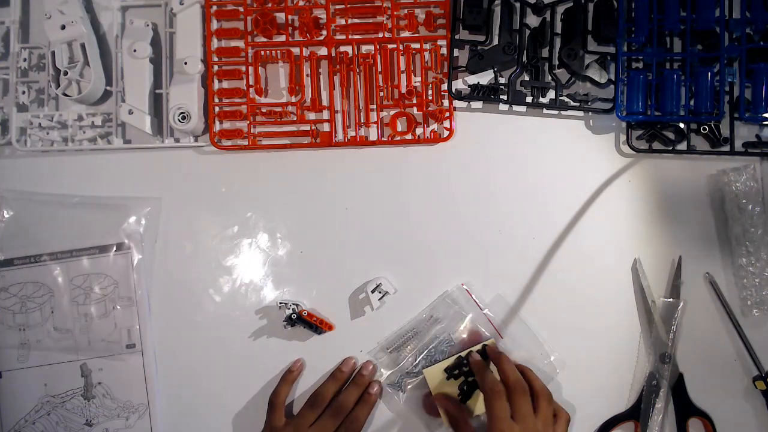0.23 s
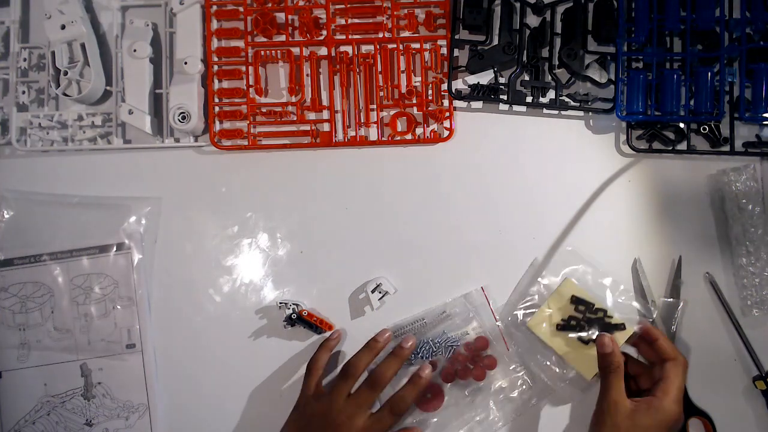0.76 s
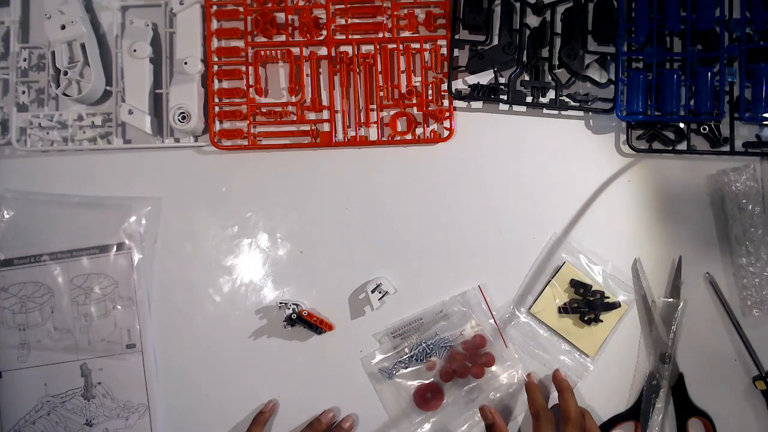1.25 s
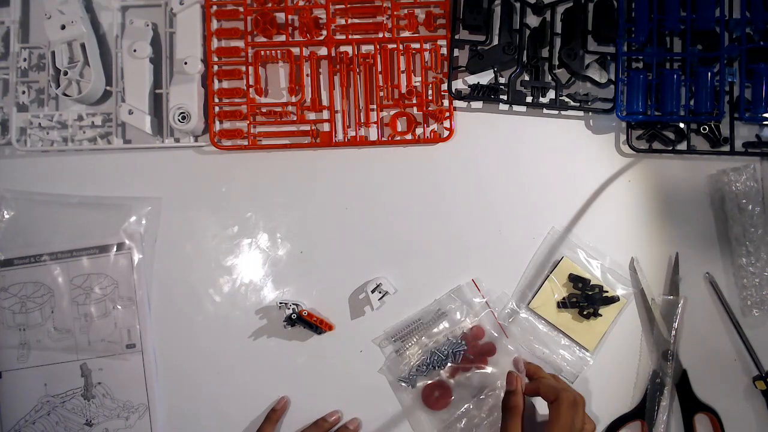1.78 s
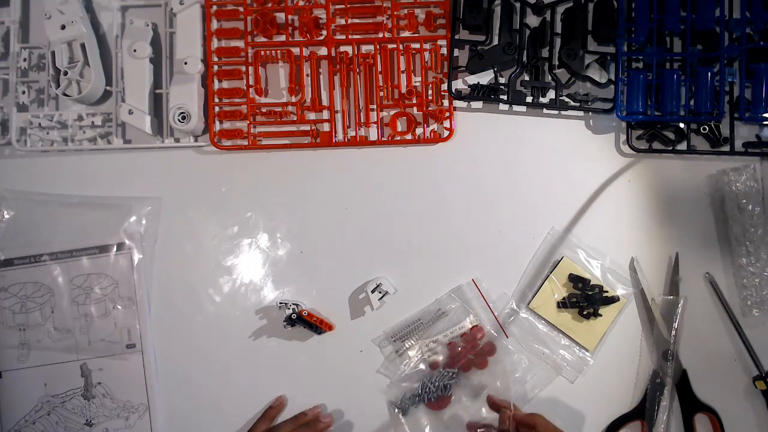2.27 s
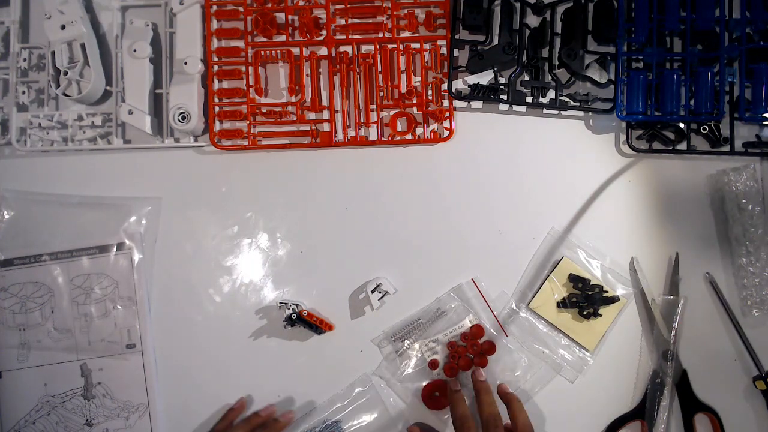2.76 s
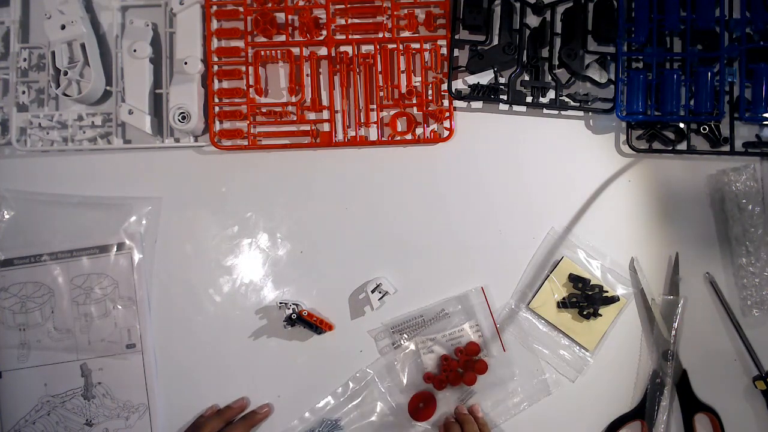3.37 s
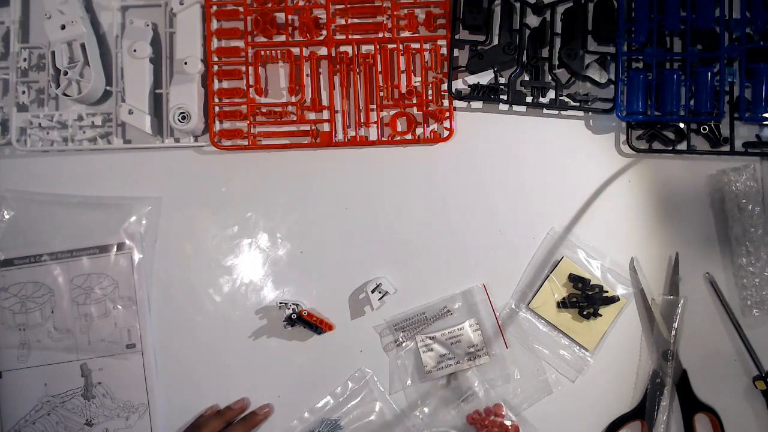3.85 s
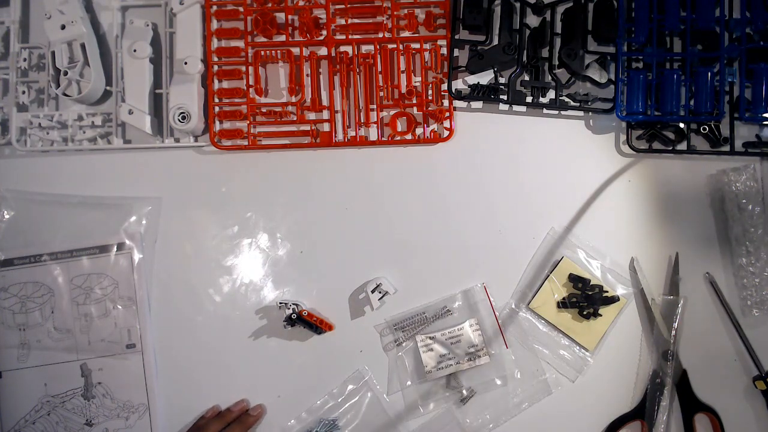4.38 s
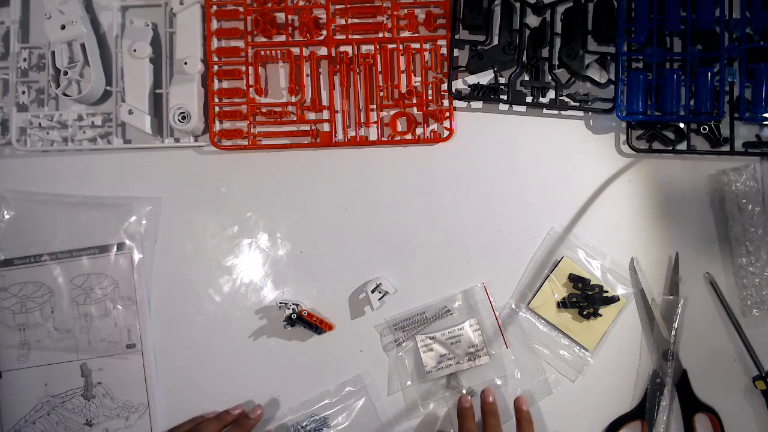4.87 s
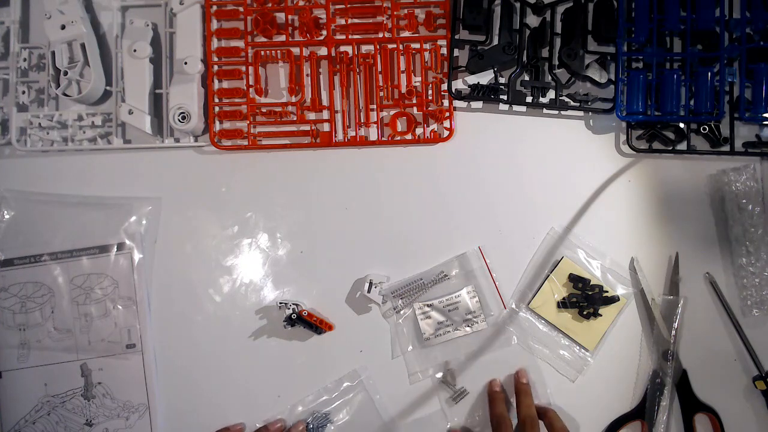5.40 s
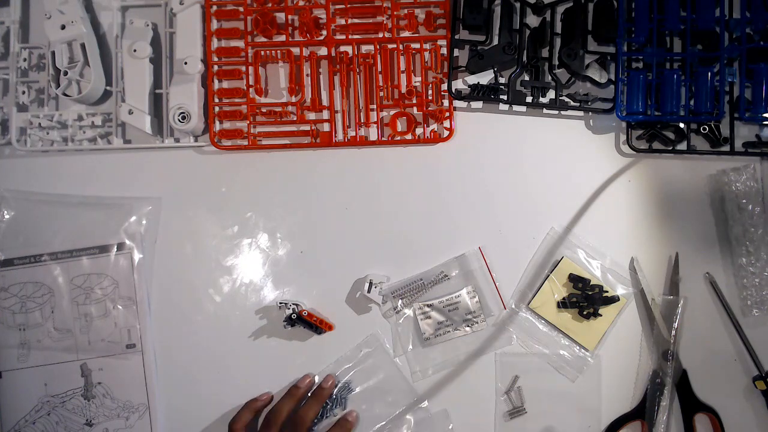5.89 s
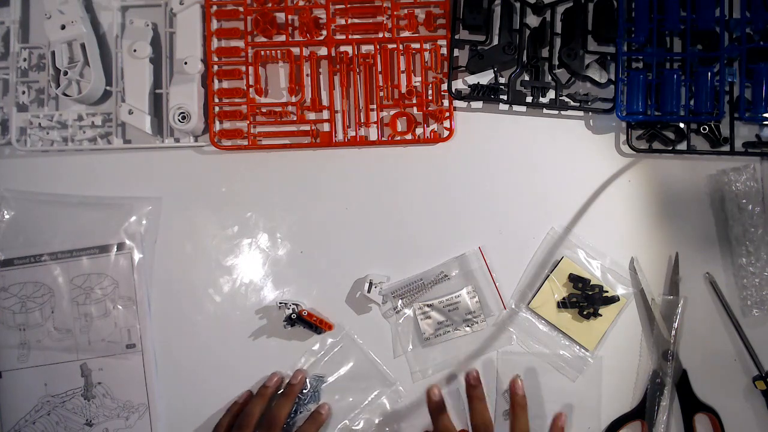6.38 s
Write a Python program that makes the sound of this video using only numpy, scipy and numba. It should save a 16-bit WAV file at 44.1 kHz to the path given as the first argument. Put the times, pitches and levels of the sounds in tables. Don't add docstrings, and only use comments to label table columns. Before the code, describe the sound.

Hands sort little plastic bags of parts on a hard table. Sharp film snaps come in irregular clusters, mixed with dry scraping, dull taps and faint finger squeaks, with near silence between. One sudden heavy smack and rattle stands far above the rest past the middle, then small crinkles return and grow at the end. Very close stereo microphone under the table, slightly stronger on the right, with a short room tail.

```python
import sys
import numpy as np
from scipy import signal
from scipy.fft import rfft, irfft
from scipy.io import wavfile
from scipy.ndimage import uniform_filter1d
from numba import njit

SR = 44100
rng = np.random.default_rng(int(sys.argv[2]) if len(sys.argv) > 2 else 0)


def master_out(mix):
    frames = np.transpose(np.atleast_2d(mix))
    ceiling = np.clip(frames, -1, 1)
    pcm = np.round(ceiling * 32767).astype(np.int16)
    wavfile.write(sys.argv[1], SR, pcm)


def natural_amplitude(level_db):
    exponent = np.asarray(level_db, float) / 20
    return 10 ** exponent


N = 292824

PAN_DB = -3.5
CREASE_HZ = [2230, 3300, 4890, 6070, 7310]


def unit(x):
    return x / np.sqrt(np.mean(x ** 2))


def peak(x):
    return x / np.abs(x).max()


def curve(f, hz, values):
    return np.interp(np.log(f), np.log(hz), values)


def panned():
    return natural_amplitude([[PAN_DB / 2], [-PAN_DB / 2]])


@njit
def svf(x, hz, sharp):
    y, b, l, k = np.empty(len(x)), 0., 0., 1 / sharp
    for i in range(len(x)):
        g = np.tan(np.pi * hz[i] / SR)
        v = (b + g * (x[i] - l)) / (1 + g * (g + k))
        b, l, y[i] = 2 * v - b, l + 2 * g * v, k * v
    return y


def band(x, hz, sharp):
    return svf(x + 1e-18, hz + np.zeros(len(x)), sharp)


def steep(x, hz, sharp):
    return band(band(x, hz, sharp), hz, sharp)


def walk(rate):
    k = int(SR / rate)
    levels = np.repeat(rng.standard_normal(N // k + 1), k)
    return 1.3 * uniform_filter1d(uniform_filter1d(levels, k), k)[:N]


def ticks(size, rate, scatter_db):
    happens = rng.random(size) < rate / SR
    return happens * rng.standard_normal(size) * natural_amplitude(scatter_db * rng.exponential(size=size))


def add(out, start_s, level_db, sound):
    i = int(start_s * SR)
    out[..., i:i + sound.shape[-1]] += sound[..., :N - i] * natural_amplitude(level_db)


def whine():
    comb_hz, chirp_hz, frame_hz = 200, 8000, 24
    t = np.arange(N) / SR
    comb = np.zeros(N)
    for k, (spread, phase) in enumerate(rng.standard_normal((18, 2)), 21):
        comb += natural_amplitude(-103 + 3.0 * spread) * np.sin(2 * np.pi * (k * comb_hz * t + phase))
    gate = uniform_filter1d(1. * ((frame_hz * t + .2) % 1 < .45), size=100)
    return comb + natural_amplitude(-90.5) * gate * np.sin(2 * np.pi * chirp_hz * t)


def hum():
    # pitch_hz, sharpness, level_db (rms)
    fan_lines = [(108, 2.9, -75.5), (181, 9.2, -74), (1120, 40., -98.5), (5560, 200., -93.5)]
    lines = np.zeros(N)
    for hz, sharp, level_db in fan_lines:
        line = unit(band(rng.standard_normal(N), hz, sharp))
        lines += natural_amplitude(level_db + 0.83 * walk(3.2)) * line
    return lines * panned()


def air():
    # frequency_hz, density_db (per Hz)
    spectrum = [(15, -29), (25, 8), (131, -6), (176, -3.5), (304, -13.5), (444, -9), (667, -23.5),
                (764, -25), (1430, -32), (2590, -32.5), (5540, -30), (7670, -33), (8790, -42.5),
                (15100, -47.5), (16400, -56.5)]
    f = np.maximum(np.fft.rfftfreq(N, 1 / SR), 1)
    colour = natural_amplitude(curve(f, *np.transpose(spectrum)))
    mid, side = irfft(rfft(rng.standard_normal((2, N))) * colour, N)
    out = 0
    for centre in 18 * 2 ** np.arange(0, 10.1, 1 / 2):
        wander_db = 3.5 * walk(5) * min(200. / centre, 1) + .6 * walk(12)
        wide = np.clip(centre / 2000., .3, 1)
        sides = np.array([band(mid + wide * side, centre, 2.5), band(mid - wide * side, centre, 2.5)])
        pan_db = PAN_DB * np.clip(np.log2(8000 / centre) / 2, 0, 1)
        out = out + natural_amplitude(wander_db) * sides * natural_amplitude([[pan_db / 2], [-pan_db / 2]]) / np.hypot(1, wide)
    return unit(out) * natural_amplitude(-65)


def room(sound):
    # frequency_hz, t60_s, level_db
    decay = [(60, 0.27, 9), (250, 0.18, 5.5), (960, .18, 7.5), (2510, 0.12, -3), (4950, 0.15, -2),
             (11240, .15, -4)]
    hz, t60_s, level_db = np.transpose(decay)
    t = np.arange(16384) / SR
    echoes = 0
    for f in 45 * 2 ** np.arange(0, 8.6, .5):
        mid, side = (band(rng.standard_normal(len(t)), f, 2.3) / np.sqrt(f) for _ in range(2))
        fade = natural_amplitude(curve(f, hz, level_db) - 60 * t / curve(f, hz, t60_s))
        width = .9 * min(f / 1500., 1)
        echoes = echoes + np.sqrt(f) * fade * (mid + np.array([[1], [-1]]) * side * width)
    build = 1 - np.exp(-t / 0.0049)
    echoes = unit(echoes * build) / np.sqrt(len(t))
    return signal.fftconvolve(sound[None], echoes, axes=1)[:, :N]


def thumps():
    # start_s, peak_db, pitch_hz, t60_s
    blows = [(0.0, -49, 40.4, 0.22), (0.168, -36.5, 39.6, 0.05), (0.341, -37.5, 165, 0.062),
             (0.758, -53, 43.1, 0.15), (1.028, -41.5, 122.8, 0.12), (1.221, -33.5, 192, 0.12),
             (2.1, -44.5, 29.6, 0.15), (2.199, -49.5, 130.8, 0.11), (2.487, -37, 37.7, 0.13),
             (2.827, -37, 48.4, 0.12), (3.099, -48, 29.6, 0.37), (4.145, -18, 106.2, 0.05),
             (4.169, -27, 42, 0.12), (4.75, -46, 30, 0.12), (4.85, -47, 40, 0.39),
             (5.028, -46, 29.07, 0.25), (5.33, -59, 29.7, 0.09), (5.529, -51, 35.0, 0.13),
             (5.649, -45.5, 176.7, 0.15), (5.953, -50, 52.7, 0.2), (6.107, -49, 40.7, 0.13),
             (6.45, -37.5, 29.9, 0.15)]
    out, t = np.zeros(N), np.arange(16384) / SR
    for start_s, peak_db, hz, t60_s in blows:
        swing = np.sin(2 * np.pi * hz * t) + .4 * np.sin(2 * np.pi * 1.9 * hz * t)
        onset = 1 - np.exp(-t / 0.0018)
        add(out, start_s, peak_db - 3.5, swing * onset * natural_amplitude(-60 * t / t60_s))
    return out


def slap():
    # start_s, peak_db, push_s
    drop_event = (4.1442, -7, .0016)
    start_s, peak_db, push_s = drop_event
    out = np.zeros(N)
    add(out, start_s, peak_db, -np.hanning(int(push_s * SR)))
    return out


def board(push, hz, sharp):
    sound = band(push, hz, sharp)
    sound = sound + 0.54 * band(push, .52 * hz, sharp) + 0.29 * band(push, 1.46 * hz, sharp)
    return steep(sound, 0.83 * hz, .7)


def smooth(sound, colour):
    return colour * np.sqrt(np.sum(sound ** 2) / np.sum(colour ** 2)) / np.abs(sound).max()


def knocks():
    # start_s, peak_db, pitch_hz, rattle_s, room_db, sharpness
    hits = [(0.058, -33, 1170, 0.0065, 4, 1.7), (0.16, -32, 1310, 0.012, -9, 1.3),
            (0.264, -39, 1460, 0.011, -4, 2.6), (0.338, -34.5, 1210, 0.0021, -24, 1.4),
            (0.479, -30, 1000, 0.014, -16, 8), (0.491, -24, 1030, 0.0036, -9, 1.3),
            (0.504, -37.5, 430, 0.006, -14, 4.0), (0.755, -31.5, 1190, 0.0084, 3, 1.3),
            (0.771, -35, 436, 0.0067, -4, 5.6), (1.013, -34.5, 692, 0.0093, 1.5, 7.5),
            (1.222, -34.5, 633, 0.006, 0, 11.3), (1.556, -53.5, 1320, 0.006, 4, 3.4),
            (2.029, -44, 824, 0.002, -1.5, 2.4), (2.199, -45.5, 1220, 0.0023, 8.5, 5.7),
            (2.21, -46, 935, 0.0075, 4.5, 6.8), (2.348, -31, 980, 0.0063, -0.5, 1.4),
            (2.427, -40, 890, 0.018, 4, 2.4), (2.465, -27.5, 1110, 0.0026, 4, 1.4),
            (2.484, -31.5, 756, 0.0032, -9, 2.9), (2.766, -48.5, 762, 0.0054, -4, 5.8),
            (2.796, -43, 708, 0.0046, -2.5, 8.2), (3.088, -43, 1570, 0.016, 4.5, 3.8),
            (3.149, -56.5, 735, 0.006, 1, 4.7), (3.335, -52, 768, 0.0037, 4.5, 2.3),
            (3.931, -60.5, 1124, 0.006, 1.5, 5.6), (4.11, -19.5, 1010, 0.013, 5, 1.54),
            (4.14, -14.5, 393, 0.011, -11.5, 1.8), (4.151, -19, 335, 0.0048, -8.5, 1.3),
            (4.835, -33, 754, 0.0085, -4, 6.3), (4.95, -52, 682, 0.006, 5, 3.2),
            (5.009, -27.5, 1090, 0.011, -5, 2), (5.029, -42, 1140, 0.0095, 6.5, 1.33),
            (5.102, -48, 774, 0.0084, -7.5, 6), (5.313, -55.5, 811, 0.014, 5, 5.9),
            (5.595, -43.5, 765, 0.006, 3.5, 3), (5.616, -40.5, 854, 0.005, 3.5, 2.6),
            (5.946, -46.5, 766, 0.013, 3.5, 3), (5.973, -36.5, 770, 0.018, -4, 2.2),
            (6.275, -42, 926, 0.013, 12, 2.3), (6.298, -40.5, 700, 0.018, 6.5, 3.3),
            (6.357, -36.5, 673, 0.0066, 5.5, 3.3), (6.42, -31, 1030, 0.003, 3.5, 2),
            (6.615, -33.5, 742, 0.0043, -2, 9.4)]
    near, far, t = np.zeros(N), np.zeros(N), np.arange(4096) / SR
    for start_s, peak_db, hz, rattle_s, room_db, sharp in hits:
        push = rng.standard_normal(len(t)) * (1 - np.exp(-t / 0.0028)) * np.exp(-t / rattle_s)
        push[0] += 6.5
        sound = board(push, hz, sharp)
        single = board(1. * (t == 0), hz, sharp)
        add(near, start_s, peak_db, peak(sound))
        add(far, start_s, peak_db + room_db, smooth(sound, single))
    return near, far


def squeaks():
    # start_s, length_s, pitch_hz, level_db
    drags = [(0.569, 0.19, 3200, -66), (1.36, .12, 2180, -55.5), (1.556, 0.073, 4840, -66),
             (2.244, 0.13, 1360, -57), (2.527, 0.14, 1390, -70), (4.309, 0.043, 5050, -65.5),
             (4.33, .03, 3420, -70), (4.351, 0.097, 4220, -71), (4.522, 0.0455, 3840, -64.5),
             (5.059, 0.265, 1340, -65), (5.101, 0.69, 3300, -74), (5.757, 0.21, 3300, -80)]
    out = np.zeros(N)
    for start_s, length_s, hz, level_db in drags:
        rub = unit(steep(rng.standard_normal(SR // 2), hz, 11.0))[:int(length_s * SR)]
        add(out, start_s, level_db - 10.5, rub * signal.windows.tukey(len(rub), .5))
    return out


def rustle():
    # start_s, film_db, scrape_db
    slides = [(0.0, -79, -68.5), (0.13, -64, -56.5), (0.24, -60, -82), (0.35, -76, -86), (0.46, -73, -71.5),
              (1.07, -79, -85), (1.29, -83, -83), (1.44, -75, -70), (1.59, -85, -82), (1.85, -82, -84.5),
              (2.07, -82, -87), (2.24, -76, -78), (2.39, -80, -49.5), (2.55, -83, -75.5),
              (2.81, -78.5, -76), (3.01, -82, -80), (3.16, -75, -72), (3.24, -64.5, -72),
              (3.37, -82, -78.5), (3.6, -84, -80.5), (4.03, -81.5, -82), (4.25, -72, -81),
              (4.59, -83.5, -82.5), (4.86, -119, -85.5), (4.99, -70, -64.5), (5.16, -83, -72),
              (5.55, -67.5, -77.5), (5.66, -89, -87.5), (5.88, -81.5, -74), (5.99, -82, -81),
              (6.32, -70.5, -74.5), (6.44, -63, -53), (6.47, -60, -78), (6.64, -51.5, -64.5)]
    start_s, *columns = np.transpose(slides)
    film_db, scrape_db = (np.interp(np.arange(N) / SR, start_s, c) for c in columns)
    creases = ticks(N, 4000, scatter_db=2.0) * natural_amplitude(5.2 * walk(36))
    crinkle = sum(natural_amplitude(8.9 * walk(6.5)) * band(creases, f, 2.3) for f in CREASE_HZ)
    crinkle = crinkle + 0.98 * steep(creases, 5700, .8) + .12 * band(creases, 11000, .9)
    grit = ticks(N, 4000, scatter_db=1.5) * natural_amplitude(2.5 * walk(30))
    scrape = steep(grit, 900, 1.)
    return natural_amplitude(film_db) * unit(crinkle) + natural_amplitude(scrape_db) * unit(scrape)


def film(push, other, hz, top_db, share_db):
    both = push + other
    body = band(both, hz, 5.) + .3 * steep(both, 3600, .8)
    body = body + sum(natural_amplitude(d) * band(both, f, 8.) for f, d in zip(CREASE_HZ, share_db))
    fizz = steep(push + 3.0 * other, 11000, 0.67)
    return body + natural_amplitude(top_db + 6.5) * fizz


def snaps():
    # start_s, peak_db, film_ring_hz, top_db, room_db, patter_s
    flips = [(0.0475, -46.5, 5120, -21, -4.5, 0.0046), (0.0582, -12.5, 2700, -25.5, 3, 0.0017),
             (0.1399, -28, 2800, -23, 3.5, 0.0039), (0.162, -19, 3072, -25.5, -5, 0.0037),
             (0.2473, -38, 1900, -20.5, 3.5, 0.0017), (0.2671, -21, 2740, -30.5, 5, 0.0012),
             (0.2745, -21.5, 2090, -26.5, 0, 0.0014), (0.328, -23.5, 4078, -21, -1, 0.0025),
             (0.3392, -9, 3733, -24.5, -6, 0.0013), (0.346, -20.5, 4100, -18.5, -1.5, 0.0029),
             (0.4828, -16, 3366, -21.5, -2.5, 0.0021), (0.5022, -49, 1890, -26, -16, 0.0023),
             (0.6457, -51, 2060, -20.5, 17, 0.0022), (0.7469, -45.5, 3640, -27.5, 20, 0.0022),
             (0.7581, -19.5, 2330, -21, 1.5, 0.0019), (0.7642, -27.5, 3350, -18, 3.5, 0.0055),
             (1.0088, -37, 4250, -23, 6.5, 0.0026), (1.2211, -56.5, 1890, -9, 11, 0.0038),
             (1.3639, -45.5, 2180, -20.5, 9, 0.0035), (1.4062, -37.5, 4640, -31, 5.5, 0.002),
             (1.4402, -39, 2250, -14.5, 11.5, 0.0033), (1.4775, -36, 5050, -38, 7, 0.0025),
             (1.5038, -44, 4840, -13, -4, 0.0025), (1.559, -52, 2090, -21, 11.5, 0.0025),
             (1.9487, -54.5, 2520, -18, 4, 0.0032), (2.0313, -34.5, 2186, -24.5, 5, 0.0018),
             (2.2837, -55, 1940, -19, 11, 0.0036), (2.3032, -43, 2500, -26, 5, 0.0025),
             (2.3306, -18.5, 2420, -40, 3, 0.0013), (2.3506, -19.5, 2800, -8, 0.5, 0.0011),
             (2.4169, -41.5, 2860, -24, 18.5, 0.0033), (2.4312, -17.5, 4300, -22, 2, 0.0018),
             (2.4629, -19.5, 4684, -24, 5.5, 0.0031), (2.482, -23.5, 4830, -17.5, 2.5, 0.0041),
             (2.4924, -28, 4970, -11, -9, 0.0025), (2.7044, -55.5, 3080, -20.5, 6, 0.0012),
             (2.743, -47.5, 2780, -17.5, 9, 0.0022), (2.7674, -42.5, 2960, -37, 5.5, 0.0043),
             (2.7955, -41.5, 3020, -17, 0.5, 0.0019), (2.937, -62.5, 3220, -19, 3, 0.0018),
             (2.9598, -48.5, 2480, -21, 8, 0.0028), (2.9899, -43.5, 5300, -27, 3, 0.0019),
             (3.0111, -39, 2760, -18, -1.5, 0.0025), (3.0908, -19, 5144, -20.5, 5, 0.0011),
             (3.1028, -25.5, 7240, -36, 4, 0.0031), (3.1214, -27.5, 5030, -14, 2, 0.0015),
             (3.1522, -30.5, 2210, -23, 0.5, 0.0019), (3.2, -41.5, 2100, -29, 4.5, 0.0041),
             (3.3246, -40.5, 2360, -30, 4, 0.0049), (3.3374, -34.5, 2600, -20, 1, 0.0031),
             (3.5344, -55, 1940, -24, 4.5, 0.0024), (3.6533, -45.5, 2710, -29, 4.5, 0.002),
             (3.7773, -43, 5470, -19, 5.5, 0.0033), (3.929, -52, 3140, -23, 4, 0.0032),
             (4.0721, -47, 2960, -28, 4.5, 0.0015), (4.0925, -36, 2620, -12.5, -1.5, 0.0021),
             (4.1097, -5, 3650, -26, -1, 0.0015), (4.1124, -10.5, 3530, -16, 0.5, 0.0011),
             (4.1361, -8.5, 2525, -15.5, 5, 0.0031), (4.1453, -0.5, 4780, -15, -1.5, 0.0023),
             (4.5361, -57, 3830, -31, 4.5, 0.0025), (4.818, -52, 3340, -24, 2.5, 0.0025),
             (4.8319, -18.5, 3976, -21.5, -1, 0.0041), (4.9498, -55.5, 3860, -23, 12.5, 0.0025),
             (4.9974, -40.5, 5150, -18, 17.5, 0.002), (5.01, -25, 3815, -24, 1, 0.004),
             (5.1048, -49.5, 3110, -36, 0, 0.0041), (5.3163, -43.5, 4440, -23, 12, 0.0022),
             (5.439, -53, 3270, -23, 8, 0.0025), (5.5842, -39, 5270, -25, 12, 0.0025),
             (5.5982, -34, 3790, -18, 6.5, 0.0025), (5.6192, -25.5, 5240, -24, -3, 0.0024),
             (5.8362, -40.5, 3820, -21, 3, 0.0025), (5.9095, -49.5, 2910, -25, 11, 0.0025),
             (5.9484, -24.5, 3800, -25, 6, 0.0012), (5.976, -23.5, 5120, -19, -0.5, 0.0017),
             (6.0182, -30.5, 4910, -23.5, -4, 0.002), (6.1192, -53, 3400, -23, 1.5, 0.0028),
             (6.2698, -29, 4860, -21, 9.5, 0.002), (6.2828, -30.5, 7580, -26, 18.5, 0.0018),
             (6.3006, -33.5, 7570, -35, 8, 0.0037), (6.3599, -26, 1880, -26.5, 3, 0.0031),
             (6.4199, -24.5, 1930, -33, 3.5, 0.0025), (6.4635, -26.5, 4540, -19, 0, 0.0022),
             (6.553, -42, 4450, -22.5, -6, 0.0021), (6.6167, -10, 3900, -24.5, 1, 0.0012)]
    lead = 512
    near, far, t = np.zeros((2, N)), np.zeros(N), (np.arange(3072) - lead) / SR
    for start_s, peak_db, hz, top_db, room_db, patter_s in flips:
        creep = 0.42 * np.exp(t / (0.35 * patter_s)) + .06 * np.exp(t / .004)
        shape = np.where(t < 0, creep, np.exp(-t / patter_s))
        both, left, right = (shape * unit(ticks(len(t), 12000, scatter_db=3.5)) for _ in range(3))
        both[lead] += 3.5 * .002 / patter_s
        share_db = -9 + 4.0 * rng.standard_normal(len(CREASE_HZ))
        sound = peak(np.array([film(both, 0.49 * own, hz, top_db, share_db) for own in (left, right)]))
        add(near, start_s - lead / SR, peak_db, sound)
        add(far, start_s - lead / SR, peak_db + room_db, sound[1])
    return near, far


def microphone(x):
    # frequency_hz, gain_db
    response = [(20, -1), (1500, -1.5), (4000, 3), (6500, -1), (8500, -9), (12000, -11.5), (15500, -8),
                (16300, -39.5)]
    f = np.maximum(np.fft.rfftfreq(N, 1 / SR), 1)
    shade_db = 4.0 * np.clip(np.log2(f / 5000), 0, 1)
    colour_db = curve(f, *np.transpose(response)) + np.array([-shade_db, shade_db]) / 2
    return irfft(rfft(x) * natural_amplitude(colour_db), N)


def scene():
    snap, snap_far = snaps()
    knock, knock_far = knocks()
    thump = thumps() + slap()
    bags = natural_amplitude(-2.5) * (rustle() + squeaks())
    sent = natural_amplitude(-2.5) * snap_far + natural_amplitude(-5.5) * knock_far + natural_amplitude(-11.5) * thump + bags
    heard = snap + knock + thump + bags + room(sent)
    return microphone(heard) * panned() + air() + hum() + whine()


def top_cut(x):
    return signal.sosfilt(signal.butter(12, 16970, fs=SR, output="sos"), x)


def record(dry):
    mix = np.clip(dry, -1, 1)
    return top_cut(mix)


dry = scene()
out = record(dry)
master_out(out)
```